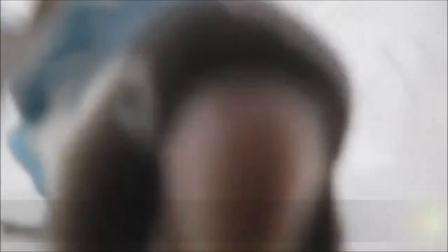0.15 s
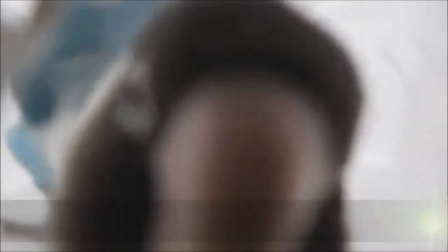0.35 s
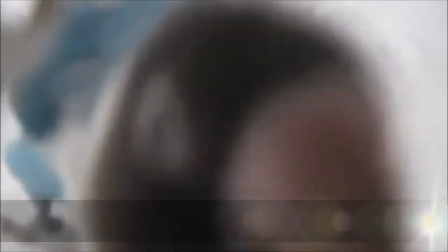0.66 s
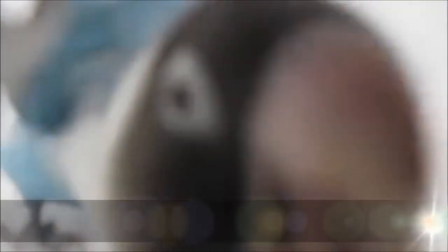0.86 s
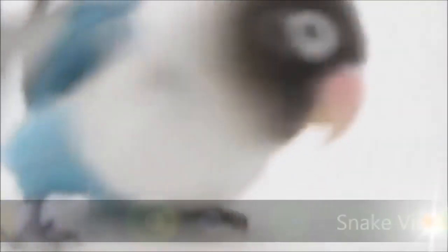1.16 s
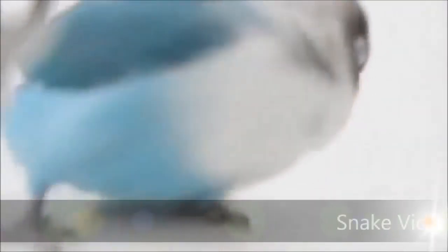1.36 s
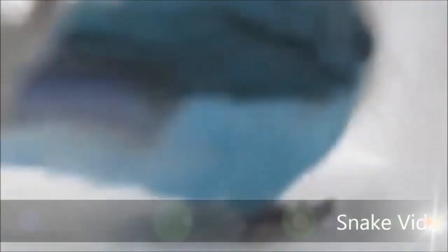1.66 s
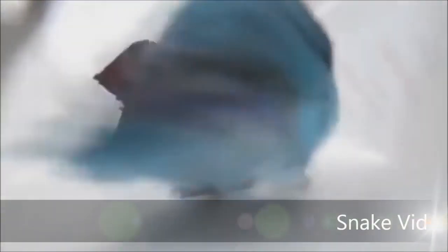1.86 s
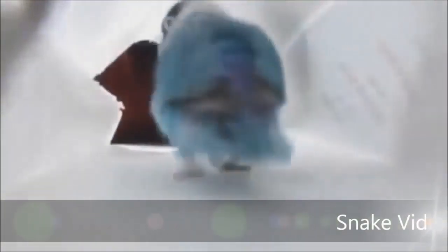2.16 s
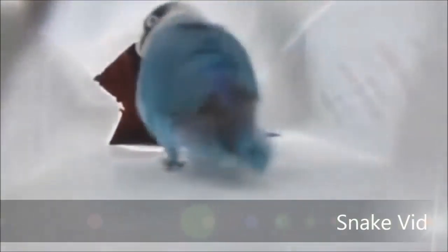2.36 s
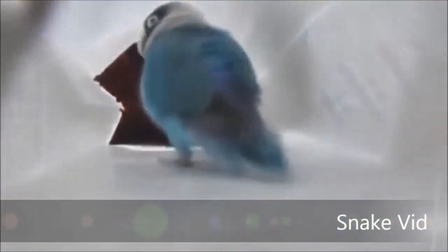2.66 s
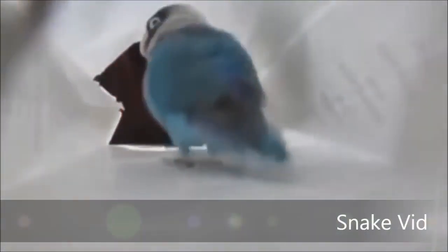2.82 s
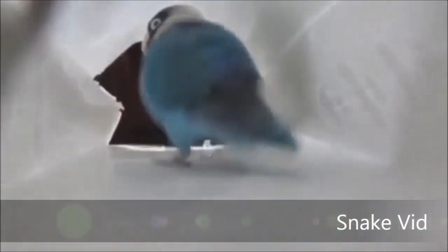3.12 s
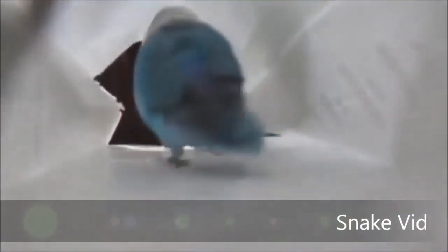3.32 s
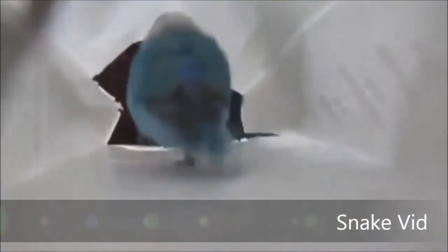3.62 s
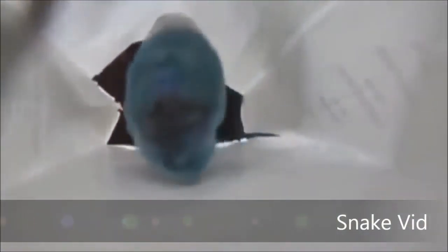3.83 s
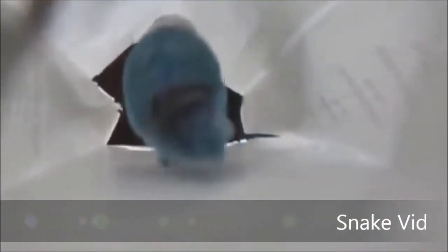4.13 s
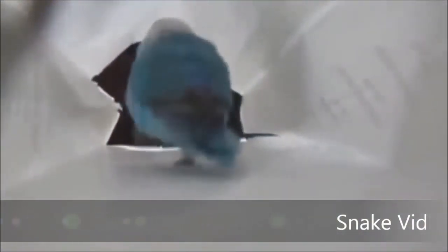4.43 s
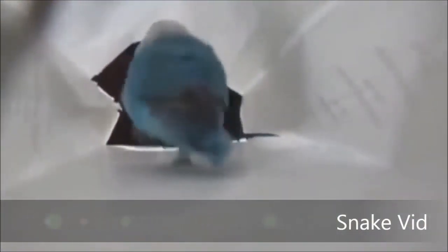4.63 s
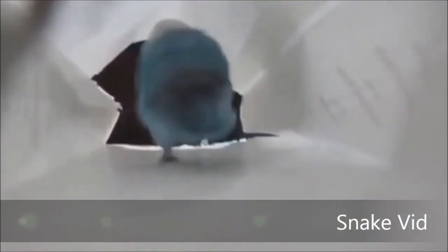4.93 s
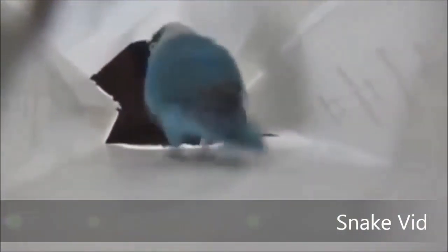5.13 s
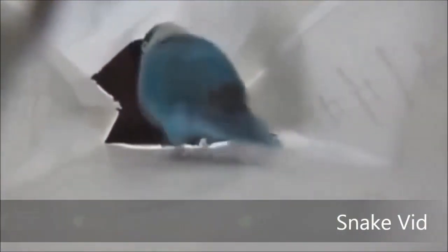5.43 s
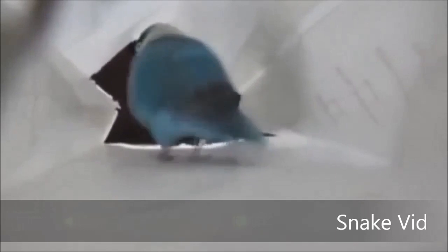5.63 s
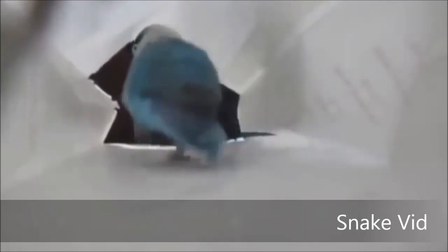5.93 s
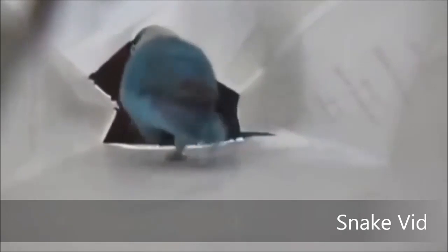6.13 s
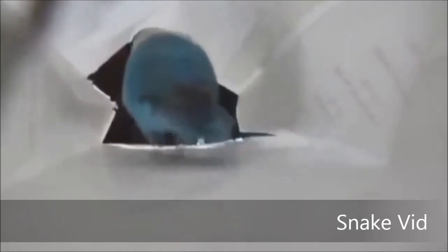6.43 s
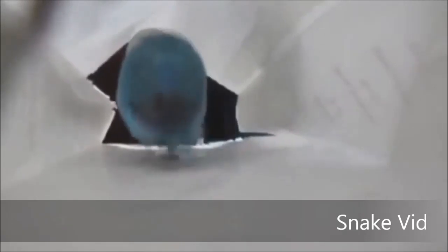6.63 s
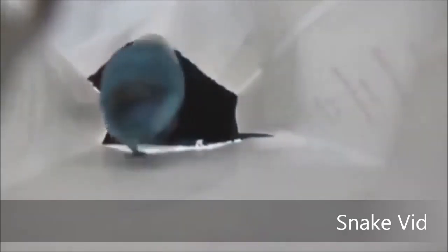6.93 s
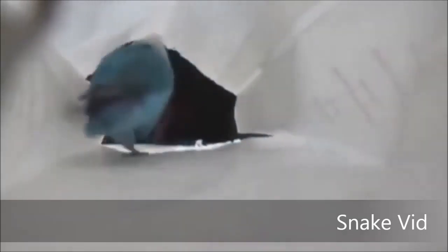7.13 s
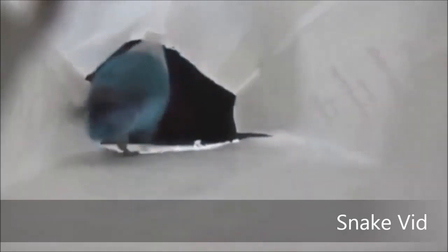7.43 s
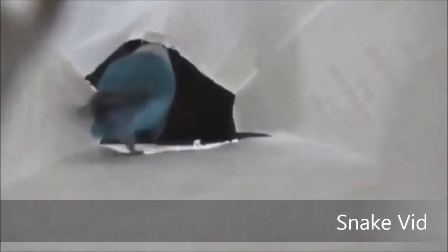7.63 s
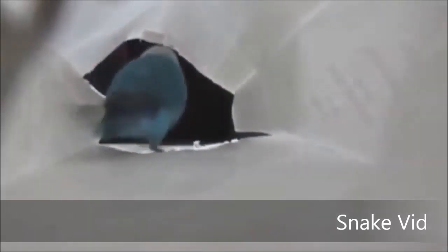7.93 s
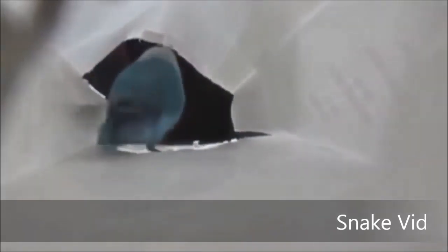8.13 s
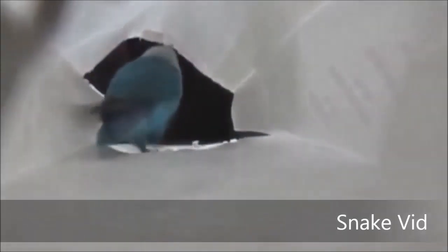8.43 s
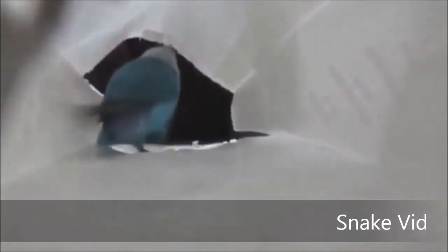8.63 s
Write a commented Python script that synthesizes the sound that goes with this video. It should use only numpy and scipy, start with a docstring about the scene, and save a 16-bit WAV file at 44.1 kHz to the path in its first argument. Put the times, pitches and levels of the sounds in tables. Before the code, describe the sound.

Inside a paper bag in a quiet room, a small parrot nibbles and crinkles paper right by the microphone for a second. After a brief lull, a few scattered steps grow into a fast, even run of sharp papery taps that lasts to the end, softening and loosening later. Faint hiss, a thin high whistle and a weak motor whine lie beneath.

```python
"""Inside a paper bag in a quiet room, a small parrot nibbles and shuffles, then patters on the paper in a fast run.
Each contact is a few milliseconds of random clicks that ring the sheet and the panel and thump the bag;
a flutter echo and a short room tail follow. Under it lie crinkling grains of noise, a steady electric whistle
made of one sine, a rough motor whine of sines and hiss that sinks to a faint idle and returns,
two brief hoarse hisses of narrow noise, and the room's own hiss."""
import sys
import numpy as np
from scipy import signal
from scipy.fft import rfft, irfft
from scipy.io import wavfile
from scipy.ndimage import uniform_filter1d

SR = 44100
rng = np.random.default_rng(int(sys.argv[2]) if len(sys.argv) > 2 else 0)


def gain_from_db(level_db):
    """Convert decibel levels to linear amplitude factors (20 dB per decade)."""
    decades = np.asarray(level_db, float) / 20
    return 10 ** decades


def int16_out(signal):
    """Quantize to a 16-bit WAV file."""
    q = np.round(np.clip(np.atleast_2d(signal).T, -1, 1) * 32767)
    wavfile.write(sys.argv[1], SR, q.astype(np.int16))


N = 386757  # length of the scene in samples
SPAN = 8192  # room for one contact and its echoes, in samples
LEAD_S = 0.006  # time before the main press of a contact, s

# relative colour of the room hiss: f/Hz, level/dB
ROOM_COLOUR = [(30, -11), (60, -1.5), (200, -4), (500, -8.5), (1000, -13), (2000, -13), (4000, -19),
               (7000, -21.5), (10000, -20.5)]
# spells of hoarse hiss: start t/s, end t/s, level/dB at the start
HOARSE_SPELLS = [(2.1, 2.24, -63), (6.67, 7.045, -59.5)]
# partials of the motor whine: f/Hz, level/dB before the running or idle change
WHINE_PARTIALS = [(3924, -79), (4264, -77), (4673, -77), (4867, -82), (5071, -69.5), (5141, -69.5),
                  (5168, -70)]
# paper shifting under the bird: t/s, level/dB before the grain level is added
RUSTLE_LEVEL = [(0, -59), (.13, -53), (.35, -54), (.63, -59), (.86, -49), (1.04, -63), (1.34, -64.5),
                (1.95, -58.5), (2.2, -77), (7.3, -76), (7.44, -56), (7.65, -56.5), (8.6, -63.5),
                (8.77, -58.5)]
# relative colour of the crinkling: f/Hz, level/dB
RUSTLE_COLOUR = [(60, -10), (250, 14.5), (700, 12.5), (2000, 4), (3500, 9), (6000, -2), (10000, 4)]
# brittle treble of the sheet: f/Hz, width/Hz, level/dB
SHEET_MODES = [(3440, 110, -3), (4710, 1270, 2), (6190, 8200, -4.5), (10930, 3300, -1)]
# knocking modes of the paper panel: f/Hz, width/Hz, level/dB
PANEL_MODES = [(600, 630, 0), (1078, 1250, 2), (2540, 870, 0.5), (3400, 730, -9)]
# air and walls of the bag: f/Hz, width/Hz, level/dB
BAG_MODES = [(75, 28.6, -4), (118.7, 17, 1), (213.8, 83, 1), (312.6, 43, -2.5), (475, 192, -5.5)]
# beak nibbling and scraping: t/s, knock level/dB, knock f/Hz, crackle level/dB, basic contact length/ms
NIBBLES = [(0.0156, -34, 3080, -27.5, 0.94), (0.027, -54, 3200, -47, 7.8), (0.0553, -32, 2100, -33, 0.66),
           (.096, -43, 1250, -43, 12.3), (0.1514, -46, 2940, -41, 13.4), (0.181, -62, 3200, -34, 4.5),
           (0.208, -63, 3180, -40, 7.8), (0.231, -44.5, 2970, -41, 4), (0.2381, -43.5, 2880, -37, 9.7),
           (.2540, -48, 2970, -38.5, 8), (0.2822, -46, 2610, -38, 10), (0.329, -41.5, 630, -53, 4.6),
           (0.3382, -35.5, 1250, -45, 3.9), (0.366, -45, 1700, -48.5, 3), (.425, -51, 1300, -45.5, 4.2),
           (.5114, -45, 600, -49, 8), (.559, -55, 3000, -56, 3.3), (.5858, -48, 980, -38, 0.52),
           (0.5922, -51, 940, -34, 0.91), (0.5971, -46.5, 1390, -37, 8.4), (0.6217, -54, 780, -57, 3.5),
           (0.64, -47, 510, -51, 5.3), (0.6564, -46, 940, -60, 5.6), (0.754, -40.5, 726, -32.5, 3.5),
           (0.7642, -41, 3120, -33, 4.2), (0.8112, -47, 510, -43.5, 8.8), (.86, -50, 520, -40, 9),
           (.9026, -41, 1940, -47, 5.4), (.919, -38, 510, -32.5, 10.6), (0.9435, -39.5, 2760, -48, 5.3),
           (0.96, -35, 580, -39.5, 7.3), (1.001, -41.5, 2940, -44.5, 8.4), (1.035, -50, 740, -55, 2.2),
           (1.048, -48, 3200, -44, 12), (1.59, -58, 3100, -40.5, 13), (1.625, -53, 2350, -41.5, 8.6),
           (1.639, -54, 3200, -36.5, 2.9)]
# brightness of the bit of paper in the beak: t/s, crackle centre f/Hz
BITE_BRIGHTNESS = [(0, 3030), (.15, 3220), (.2, 4320), (.235, 3270), (.4, 3300), (.58, 6040), (.96, 5230),
                   (.99, 3320), (1.6, 3400), (1.64, 9650)]
# feet pattering on the paper: t/s, knock level/dB, knock f/Hz, crackle level/dB, basic contact length/ms
TAPS = [(1.78, -35.5, 2500, -30.5, 4), (1.85, -45, 600, -38, 7), (1.8646, -37, 1830, -56, 1.2),
        (1.915, -30.5, 2640, -34.5, 8), (2.0291, -44, 715, -50.5, 8.5), (2.0919, -41.5, 1250, -39.5, 1.8),
        (2.101, -41, 2260, -37, 4.9), (2.2244, -41.5, 1010, -46, 7.4), (2.299, -53, 660, -47, 6.6),
        (2.3787, -36.5, 1110, -35.5, 2.5), (2.501, -31.5, 2320, -33, 5.6), (2.5536, -47.5, 1040, -63, 8.1),
        (2.5911, -25.5, 1160, -23.5, 1.73), (2.6815, -25.5, 940, -28, 5), (2.7592, -29, 2220, -27.5, 5.5),
        (2.8504, -26.5, 1320, -23.5, 3.7), (2.9318, -25.5, 1190, -26, 1.97), (3.0143, -23, 2220, -24, 4.64),
        (3.0901, -28.5, 2120, -25, 4.5), (3.1845, -26, 2300, -26.5, 4), (3.2646, -24, 2210, -25, 3.15),
        (3.3252, -41, 600, -65, 7.1), (3.353, -29, 2790, -30, 1.4), (3.438, -26, 1250, -23.5, 3.36),
        (3.5312, -30, 940, -32, 1.04), (3.6382, -27.5, 973, -28.5, 4.24), (3.73, -32.5, 1270, -35.5, 4),
        (3.8445, -26.5, 1390, -27.5, 2.2), (3.9374, -32, 1120, -28.5, 10.2),
        (4.039, -24, 2170, -27.5, 2.38), (4.1252, -29, 665, -32, 1.55), (4.2373, -27, 2250, -27, 2.92),
        (4.341, -30, 1220, -28.5, 6.4), (4.4454, -28.5, 2400, -29, 0.95), (4.534, -30, 1590, -32, 3.7),
        (4.625, -25, 1480, -30, 5.36), (4.7285, -27, 1220, -30, 2.62), (4.818, -29, 2600, -24.5, 1.7),
        (4.9214, -28, 1080, -28.5, 4.1), (5.0169, -25.5, 2570, -28.5, 6.8), (5.0625, -65, 2720, -37.5, 8.8),
        (5.1253, -28.5, 2230, -27.5, 7.2), (5.2032, -28, 1270, -28.5, 4.9), (5.272, -50, 754, -62, 7.8),
        (5.312, -26.5, 2470, -24, 7.1), (5.3838, -29, 635, -28.5, 7.7), (5.4877, -29, 1030, -25.5, 3.36),
        (5.499, -33.5, 2720, -50, 6.2), (5.5568, -31, 1480, -28, 2.8), (5.659, -28.5, 1200, -26.5, 3.55),
        (5.744, -28, 1520, -29, 2.35), (5.856, -31.5, 1140, -30, 2.77), (5.864, -41.5, 1770, -41, 8.2),
        (5.9412, -29, 1130, -26, 5.3), (6.0516, -31.5, 2220, -30.5, 3.2), (6.1154, -28.5, 860, -28.5, 2.2),
        (6.2261, -29, 870, -30, 5.3), (6.3059, -27, 1920, -30, 3.2), (6.4038, -29, 1010, -26.5, 3.2),
        (6.4831, -29, 1070, -28, 3.1), (6.5745, -31.5, 1170, -28, 3), (6.6672, -31, 900, -25.5, 2.2),
        (6.752, -36, 910, -33, 10.7), (6.8482, -34, 1590, -30.5, 0.82), (6.9437, -35, 2500, -33, 6.4),
        (6.9606, -36.5, 705, -39.5, 5.4), (7.0287, -26.5, 2230, -28.5, 1.39),
        (7.1128, -28.5, 2360, -31, 2.14), (7.207, -27.5, 2170, -29, 2.23), (7.2892, -36.5, 2300, -34, 4.2),
        (7.407, -36, 1470, -29.5, 3.1), (7.476, -33, 2550, -31, 9.7), (7.5033, -33.5, 1560, -34, 3.5),
        (7.573, -24.5, 1410, -26.5, 5.1), (7.655, -33.5, 2570, -34.5, 4.6), (7.7406, -33.5, 2660, -28, 3.5),
        (7.7523, -36, 920, -34, 4.7), (7.764, -26.5, 1510, -37, 7.8), (7.8209, -32.5, 2400, -29.5, 6.5),
        (7.9179, -27, 1120, -26.5, 11.6), (8.0116, -43, 2440, -31.5, 7), (8.1393, -27.5, 1130, -26, 3.14),
        (8.2177, -34, 2330, -33, 12.5), (8.3283, -40, 840, -31.5, 3.9), (8.3417, -34.5, 2730, -34, 11.4),
        (8.4243, -41, 2330, -39.5, 9.2), (8.5291, -34.5, 860, -31, 2.23), (8.5551, -60.5, 600, -39.5, 12),
        (8.634, -45.5, 850, -48, 8.6), (8.6523, -49, 600, -42.5, 14), (8.7354, -34.5, 1030, -31, 2.76)]
# how freely the bag thumps where the bird stands, for a step of -30 dB: t/s, thump level/dB
BAG_GIVE = [(1.78, -36.5), (1.9, -48), (2.25, -38.5), (2.4, -40), (3.1, -42.5), (3.5, -43.5), (4.9, -45),
            (5.35, -40), (6.2, -39.5), (6.85, -42.5), (7.1, -36.5), (8.2, -36.5), (8.77, -41)]
# phone microphone and its band limit: f/Hz, level/dB
MICROPHONE = [(20, 5), (50, 2), (10000, 0), (11000, -11), (11800, -23), (12600, -11.5), (14300, -12.5),
              (15300, -21), (16300, -54), (17000, -90)]


def level(x, db):
    """Scale to an rms level in dB."""
    return x * gain_from_db(db) / np.sqrt(np.mean(x ** 2))


def shape(x, points):
    """Filter along a line of (Hz, dB) points, drawn over log frequency."""
    hz, db = np.transpose(points)
    f = np.arange(N // 2 + 1) * SR / N + 1
    gain = gain_from_db(np.interp(np.log(f), np.log(hz), db))
    return irfft(rfft(x) * gain, N)


def ring(hz, width, size=SPAN):
    """Frequency response of one resonance, gain 1 at its centre."""
    f = np.arange(size // 2 + 1) * SR / size
    return 1j * f * width / (hz ** 2 - f ** 2 + 1j * f * width)


def body(modes):
    """Sum of resonances with alternating sign."""
    return sum((-1) ** k * gain_from_db(db) * ring(hz, width) for k, (hz, width, db) in enumerate(modes))


def curve(rows):
    """Join (s, value) rows into one value a sample."""
    return np.interp(np.arange(N) / SR, *np.transpose(rows))


def walk(rate):
    """Random values drawn rate times a second and smoothed; spread near 1."""
    hold = int(SR / rate)
    steps = np.repeat(rng.standard_normal(N // hold + 1), hold)
    smooth = uniform_filter1d(uniform_filter1d(steps, hold), hold)
    return 1.3 * smooth[:N]


def clicks(size, spread_db):
    """Dense clicks, a few of them much larger than the rest."""
    boost_db = spread_db * np.minimum(rng.exponential(size=size), 4.5)
    return rng.standard_normal(size) * gain_from_db(boost_db)


def room():
    """Quiet air: coloured noise that wavers slightly."""
    room_db = -60
    air = level(shape(rng.standard_normal(N), ROOM_COLOUR), room_db)
    return air * gain_from_db(1.0 * walk(10))


def hoarse():
    """Brief rough hiss: noise through a narrow resonance, sinking by 1 dB and then fading out."""
    centre_hz, width_hz, sink_db = 1760, 390, -1
    spectrum = rfft(rng.standard_normal(N)) * ring(centre_hz, width_hz, size=N) ** 2
    hiss = level(irfft(spectrum, N), 0) * gain_from_db(2.1 * walk(12))
    loudness = 0
    for start, end, db in HOARSE_SPELLS:
        fade = [(start - 0.02, 0), (start + 0.016, 1), (end - 0.05, gain_from_db(sink_db)), (end + 0.04, 0)]
        loudness = loudness + gain_from_db(db) * curve(fade)
    return hiss * loudness


def whistle():
    """A thin electric tone: one sine with slight random drift in level and phase."""
    tone_hz, tone_db = 5879.7, -64
    phase = 2 * np.pi * tone_hz * np.arange(N) / SR + 0.22 * walk(13)
    return gain_from_db(tone_db + 1.0 * walk(37)) * np.sqrt(2) * np.sin(phase)


def whine():
    """Partials of a small motor, each unsteady, over a band of gear hiss."""
    off_s, back_s, fade_s = 1.96, 7.8, 0.12
    run_db, idle_db = 4, -10
    t = np.arange(N) / SR
    partials = 0
    for hz, db in WHINE_PARTIALS:
        sway_db = 1.5 * walk(40)
        slip = 0.5 * walk(30)  # phase wander, radians
        partials = partials + gain_from_db(db + sway_db) * np.sqrt(2) * np.sin(2 * np.pi * hz * t + slip)
    band = ring(4300, 1500, size=N) + 2.5 * ring(5135, 130, size=N)
    gears = level(irfft(rfft(rng.standard_normal(N)) * band, N), -69.5)
    # 0 while running, 1 while idling
    idle = np.clip(np.minimum(t - off_s, back_s + fade_s - t) / fade_s, 0, 1)
    return (partials + gears) * gain_from_db(run_db + (idle_db - run_db) * idle)


def rustle():
    """Fine crinkling with lone creases snapping in it; it flickers as the paper shifts."""
    grains = level(shape(clicks(N, spread_db=6.5), RUSTLE_COLOUR), 1.4)
    flicker = gain_from_db(4.1 * walk(45))
    return grains * flicker * gain_from_db(curve(RUSTLE_LEVEL))


def echoes(t):
    """Power of a flutter between two facing walls and of the diffuse tail, against the direct sound."""
    flutter_s = 0.0142
    decay = np.log(1000)  # a fall of 60 dB
    near_tail = gain_from_db(-29.5) * np.minimum(t / 0.0026, 1) * np.exp(-decay * t / 0.046)
    strength = near_tail + gain_from_db(-58.0) * np.exp(-decay * t / 0.54)
    for k in range(1, 5):
        late = t - k * flutter_s
        blur_s = 0.002 + 0.002 * k
        strength = strength + gain_from_db(-27 - 8 * k) * (late > 0) * np.exp(-np.abs(late) / blur_s)
    return strength ** 2


def burst(spectrum, db):
    """Turn spectra into sound, each row with the energy of 5 ms at its level."""
    x = irfft(spectrum, SPAN)
    energy = np.sum(x ** 2, axis=1, keepdims=True)
    return x * gain_from_db(db)[:, None] * np.sqrt(SR / 200 / energy)


def contacts(s, knock_db, hz, crackle_db, crackle_colour, thump_db, ms, rise, spread_db):
    """Slips crowd into a contact: a short panel knock, a longer sheet crackle and a slower bag thump."""
    t, rows = np.arange(SPAN) / SR, (len(s), SPAN)
    since = np.maximum(t - LEAD_S, 0)
    touch = gain_from_db(-19.5) * np.exp(-np.abs(t - LEAD_S) / 0.0012)

    # below soft_db the panel loses more and more, so mostly the touched spot sounds
    soft_db, loss_per_db = -39, 0.6
    panel = body(PANEL_MODES) * gain_from_db(loss_per_db * np.minimum(knock_db - soft_db, 0))[:, None]
    # the spot that is struck rings at its own pitch above the modes of the whole panel
    spot = ring(hz[:, None], 260) * ring(hz[:, None], 1400)
    knock_colour = panel + gain_from_db(6.0) * spot
    # the room gathers sound from the whole panel, so the struck spot blurs in it
    blurred_spot = gain_from_db(-8.0) * ring(hz[:, None], 1200)
    hollow = gain_from_db(3) * ring(1854, 56)  # a hollow of the bag that rings on after each knock
    room_colour = panel + blurred_spot + hollow

    # near colour, echo colour, level/dB, echo rattle level/dB, stretch of the contact, share of a hard blow
    layers = ((knock_colour, room_colour, knock_db, -1.0, 0.8, 0.7),
              (crackle_colour, crackle_colour, crackle_db, -1.5, 1.15, 0.3))
    sound = 0
    for colour, far_colour, db, wet_db, stretch, blow in layers:
        contact = stretch * np.maximum(ms, 0.5)[:, None] / 1000  # s
        # a light first touch, a build-up that is slower in long scrapes, then the paper lets go
        build = 1 - np.exp(-since / (rise * contact))
        let_go = np.exp(-since / (0.71 * contact) - (since / (2.8 * contact)) ** 4)
        press = touch + build * let_go
        press_energy = np.sum(press ** 2, axis=1)
        slips = press * clicks(rows, spread_db)
        slips = slips * np.sqrt(press_energy / np.sum(slips ** 2, axis=1))[:, None]
        # one hard blow where the pressure peaks; short contacts put more of their energy into it
        hard = blow * np.sqrt(press_energy * np.minimum(3.8 / ms, 1))
        slips[np.arange(len(s)), np.argmax(press, axis=1)] = hard
        # the walls return the contact as many overlapping copies, and the sheet rattles unevenly in them
        echo_power = irfft(rfft(press ** 2) * rfft(echoes(t)), SPAN)
        wash = np.sqrt(np.abs(echo_power)) * level(clicks(rows, spread_db=3.5), wet_db)
        sound = sound + burst(rfft(slips) * colour + rfft(wash) * far_colour, db)

    push = (since / 0.006) * np.exp(-since / 0.0073)
    sound = sound + burst(rfft(push * rng.standard_normal(rows)) * body(BAG_MODES), thump_db)

    out = np.zeros(N + SPAN)
    starts = ((s - LEAD_S - 0.12 * ms / 1000) * SR).astype(int)
    for start, row in zip(starts, sound):
        out[start:start + SPAN] += row
    return out[:N]


def nibbles():
    """Beak on the paper: the crackle takes the brightness of the bite; duller knocks shake the bag more."""
    s, knock_db, hz, crackle_db, ms = np.transpose(NIBBLES)
    crackle_hz = np.interp(s, *np.transpose(BITE_BRIGHTNESS))[:, None]
    bite = ring(crackle_hz, 0.51 * crackle_hz) * ring(5200, 8600)
    colour = bite + 0.22 * body(SHEET_MODES)
    thump_db = knock_db - 5.5 - 4.4 * np.log2(hz / 1000)
    return contacts(s, knock_db, hz, crackle_db, colour, thump_db, ms, rise=0.53, spread_db=5.5)


def taps():
    """Claws on the sheet: every step shares the paper's treble; harder steps thump the bag more."""
    usual_step_db, thump_per_step_db, scatter_db = -30, 0.55, 1
    s, knock_db, hz, crackle_db, ms = np.transpose(TAPS)
    harder_db = np.maximum(knock_db, crackle_db) - usual_step_db
    give_db = np.interp(s, *np.transpose(BAG_GIVE))
    thump_db = give_db + thump_per_step_db * harder_db + scatter_db * rng.standard_normal(len(s))
    colour = body(SHEET_MODES) * ring(7200, 9000)
    return contacts(s, knock_db, hz, crackle_db, colour, thump_db, ms, rise=0.24, spread_db=3.0)


def scene():
    """All sources at one microphone: both channels alike."""
    background = room() + hoarse() + whistle() + whine()
    bird = rustle() + nibbles() + taps()
    mono = background + bird
    return np.array([mono, mono])


def top_cut(x):
    """Nothing passes above the cut-off."""
    return signal.sosfilt(signal.butter(12, 16460, fs=SR, output="sos"), x)


def record(dry):
    """The phone microphone colours the mix and limits its band."""
    mix = shape(dry, MICROPHONE)
    return top_cut(mix)


dry = scene()
out = record(dry)
int16_out(out)
```